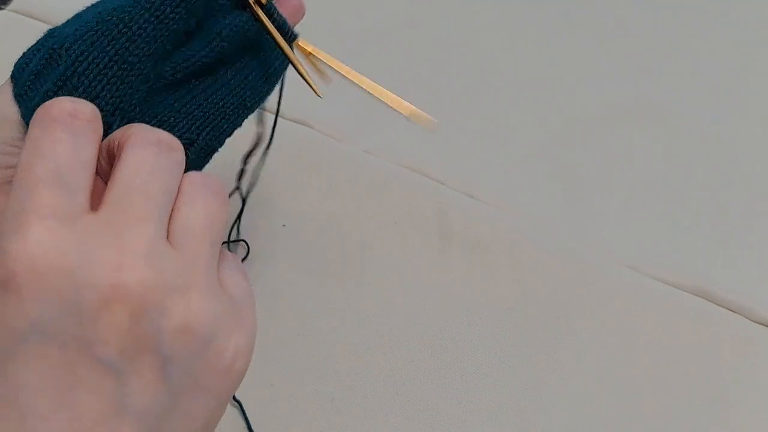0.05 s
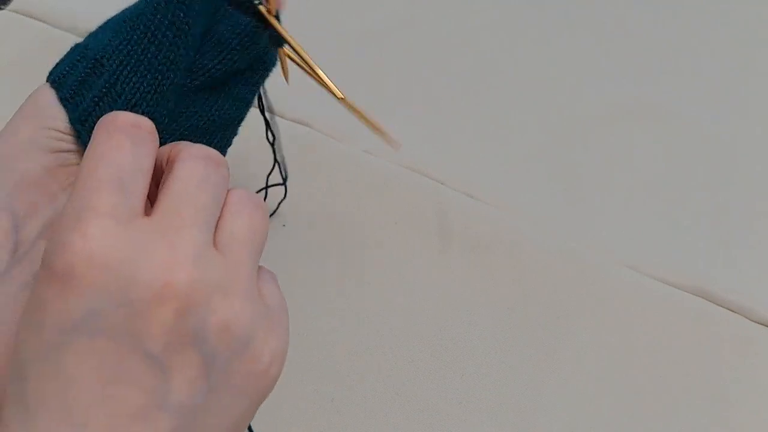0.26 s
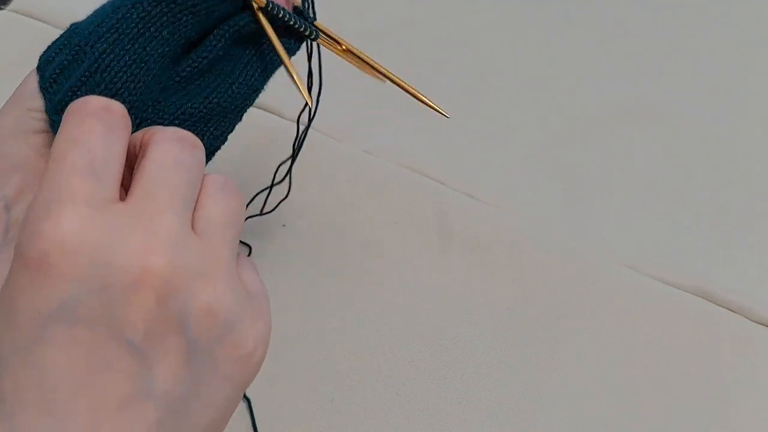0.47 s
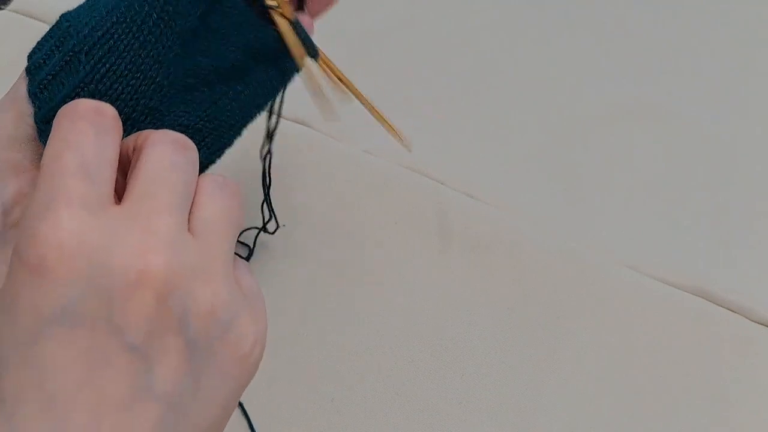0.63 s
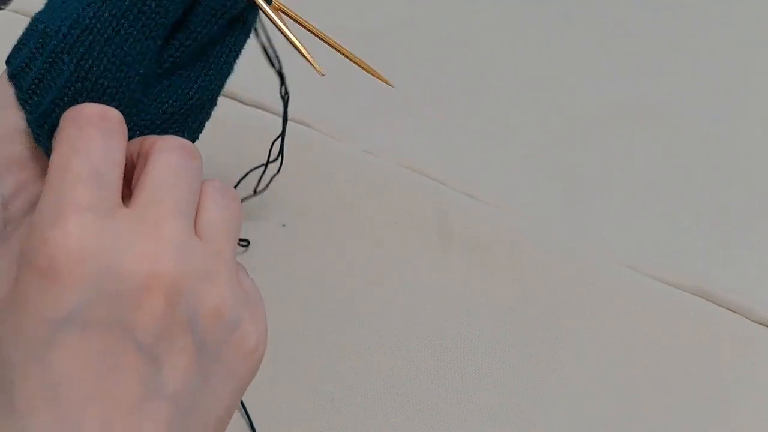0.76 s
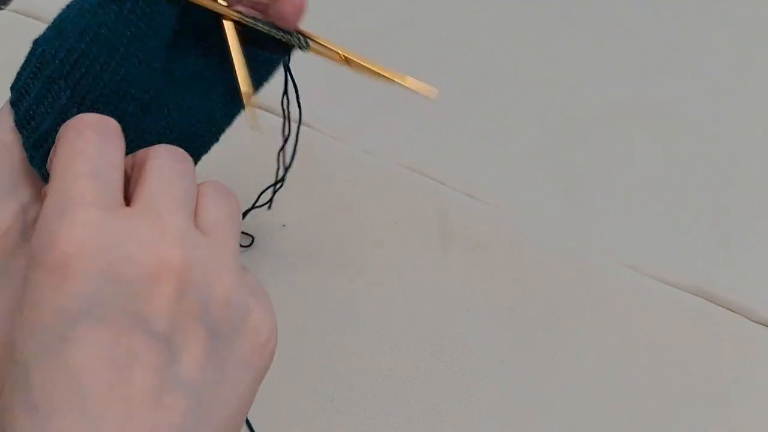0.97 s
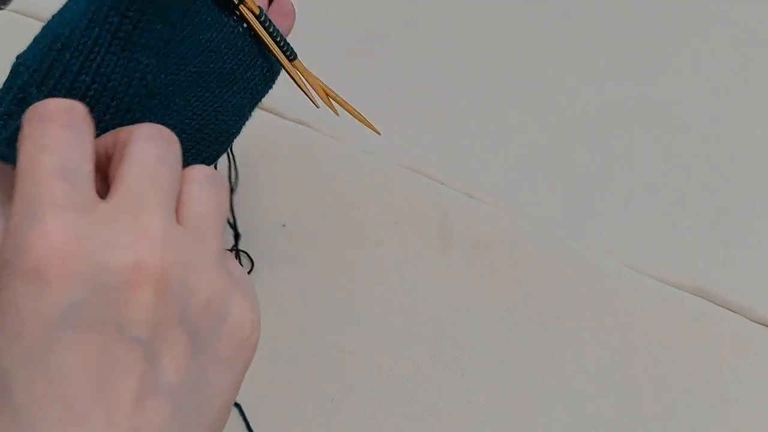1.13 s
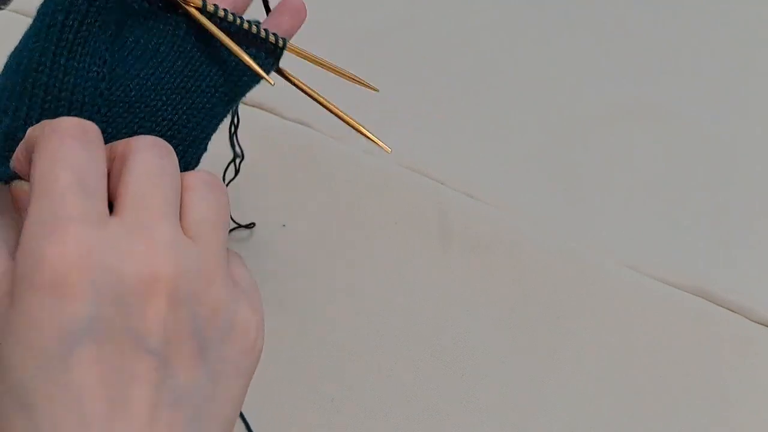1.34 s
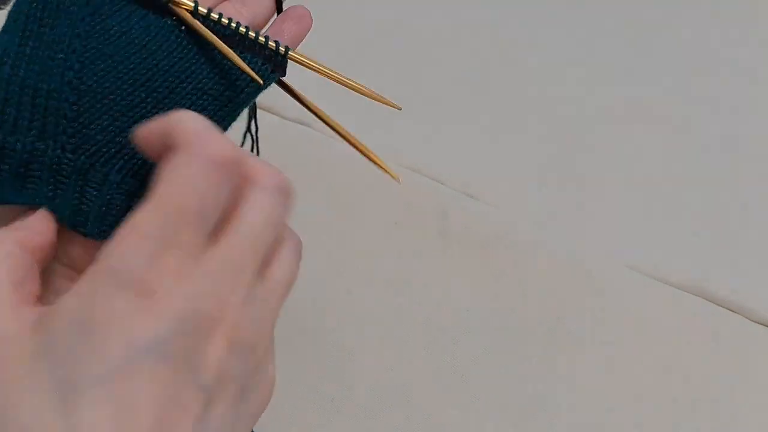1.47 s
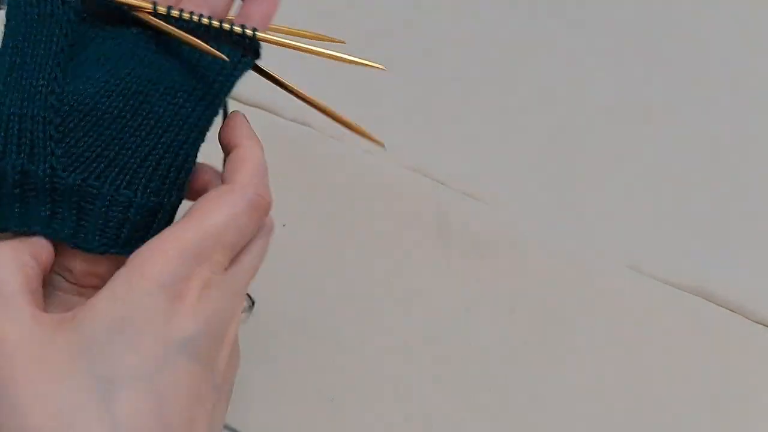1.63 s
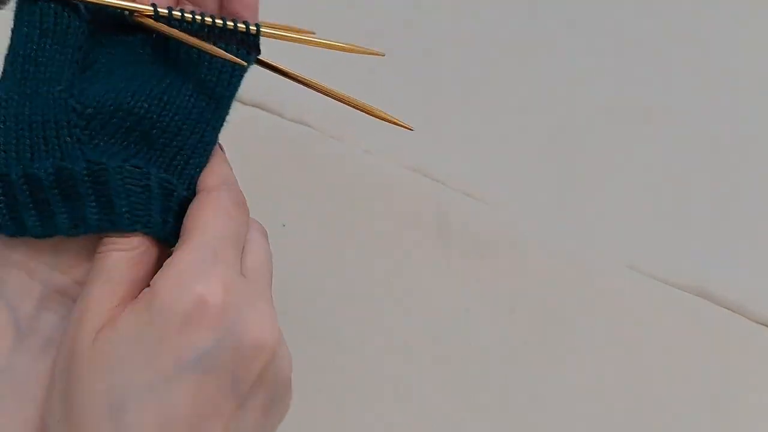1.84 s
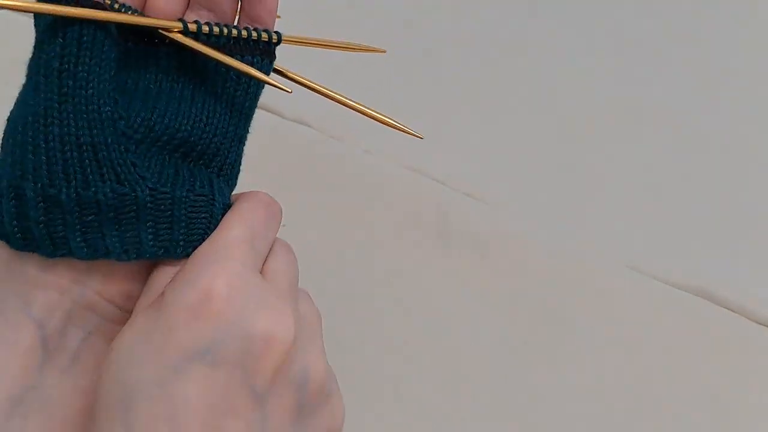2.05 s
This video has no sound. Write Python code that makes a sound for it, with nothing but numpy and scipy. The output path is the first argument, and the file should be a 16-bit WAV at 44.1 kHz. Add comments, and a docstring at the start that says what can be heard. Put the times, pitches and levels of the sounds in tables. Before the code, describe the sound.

Bright, tinny clinks of hollow knitting needles, with soft wool rustle and a low handling rumble

```python
"""A woollen cuff is pulled over a hand while hollow metal knitting needles knock against each other.
From the start: a stand's low sway (gliding sine), a quiet room's hiss, wool (noise grains) and skin rub.
Soft table bumps (short sine bursts) join at 0.12 s; knocks (struck bending modes) and ticks (damped,
wavering pitches) crowd in from 0.2 s, with a short bright room tail. After 1.25 s they grow sparse and faint."""
import sys
import numpy as np
from scipy import signal
from scipy.fft import rfft, irfft
from scipy.io import wavfile
from scipy.ndimage import uniform_filter1d

SR = 44100
rng = np.random.default_rng(int(sys.argv[2]) if len(sys.argv) > 2 else 0)


def to_wav(sig):
    """Store sig (one row per channel, or 1-D mono) as 16-bit WAV at the path in sys.argv[1].

    Samples outside -1..1 are clipped; the rate is SR.
    """
    pcm = np.clip(np.atleast_2d(sig), -1, 1) * 32767
    pcm = np.round(pcm).astype(np.int16)
    wavfile.write(sys.argv[1], SR, pcm.T)  # frames by channels


def invert_db(x):
    """Field ratio 10**(x/20) for x, a level in decibels (scalar or array-like)."""
    u = np.asarray(x, float) / 20
    return 10 ** u


N = 92610

# stand sway: (time [s], pitch [Hz], level [dB])
SWAY = [(0.0, 53.2, -32), (0.03, 53.6, -36), (0.05, 53.9, -48), (0.06, 54.4, -38), (0.14, 54.6, -33),
        (0.16, 54.6, -42), (0.19, 54.6, -35), (0.38, 54.6, -39), (0.41, 54.1, -53), (0.45, 51.9, -31),
        (0.48, 50.0, -29), (0.51, 49.0, -30), (0.57, 49.2, -24), (0.67, 48.2, -25), (0.7, 47.9, -36),
        (0.74, 47.8, -24), (0.88, 47.7, -25), (0.99, 47.7, -51), (1.02, 47.7, -39), (1.1, 47.7, -41),
        (1.15, 47.7, -53), (1.2, 47.8, -37), (1.23, 48.6, -36), (1.27, 50.2, -56), (1.3, 50.4, -43),
        (1.32, 50.3, -54), (1.36, 49.5, -39), (1.42, 49.0, -45), (1.43, 49.1, -53), (1.49, 49.1, -35),
        (1.53, 49.1, -55), (1.57, 49.1, -36), (1.61, 49.0, -53), (1.67, 49.1, -37), (1.72, 49.1, -46),
        (1.76, 49.1, -36), (1.79, 49.1, -49), (1.83, 49.1, -41), (1.9, 49.0, -57), (1.94, 49.1, -40),
        (2.0, 49.1, -52), (2.03, 49.1, -41), (2.05, 49.1, -54), (2.1, 49.1, -40)]
# handling noise spectrum: (frequency [Hz], relative level [dB])
SHAKE_SPECTRUM = [(38, -73), (65, -3.5), (81, -19), (146, -1.5), (173, -26.5), (400, -21), (520, -60),
                  (880, -120)]
SHAKE_MAX_DB, SHAKE_DB_PER_SWAY_DB = -46, 0.85

# room hiss spectrum: (frequency [Hz], relative level [dB])
HISS_SPECTRUM = [(12, -16), (20, -0.5), (55, -11), (95, -12), (137, -14.5), (191, -19.5), (253, -17),
                 (374, -25.5), (751, -32), (1020, -26.5), (1110, -30.5), (2950, -37), (9770, -41),
                 (15700, -50)]
HISS_RMS_DB = -47.5

# wool rustle: (time [s], level [dB])
WOOL_LEVEL = [(0, -52), (.04, -46), (.1, -57.5), (.17, -49), (.25, -37), (.3, -46), (0.359, -44),
              (.41, -66), (.47, -58.5), (0.508, -41), (.6, -39), (.67, -41.5), (.76, -43.5), (.83, -48.5),
              (0.872, -46.5), (.9, -55), (.92, -65), (.96, -47.5), (1.008, -45), (1.04, -53.5),
              (1.1, -46.5), (1.15, -49), (1.18, -66), (1.22, -48), (1.27, -49), (1.3, -53.5), (1.37, -58),
              (1.41, -52.5), (1.44, -47.5), (1.49, -55), (1.54, -57), (1.59, -49), (1.63, -59),
              (1.665, -59), (1.7, -58), (1.74, -67), (1.78, -56), (1.798, -42), (1.84, -56), (1.87, -61),
              (1.96, -65), (2.03, -53.5), (2.1, -53.5)]
# wool spectrum: (frequency [Hz], relative level [dB])
WOOL_SPECTRUM = [(1470, -21.5), (2500, -7.5), (2870, -13.5), (3820, -9), (4120, -10.5), (10200, 3),
                 (12100, -7), (14300, -5), (15700, -11)]
WOOL_GRAINS_PER_S, WOOL_PATCH_DB = 4000, 2.5
WOOL_GRAIN_DB = 2.1  # mean excess of grain size, before the square root

# skin on wool: (time [s], level [dB])
RUB_LEVEL = [(0, -58), (.15, -59.5), (.3, -67), (.55, -57), (.7, -63), (1.01, -66), (1.2, -64), (1.3, -60),
             (1.4, -60), (1.55, -55.5), (1.65, -67), (1.8, -62), (2.1, -60)]
# skin rub spectrum: (frequency [Hz], relative level [dB])
RUB_SPECTRUM = [(250, -43), (500, 8), (1300, 2), (2200, -4.5), (3500, -32)]

# soft knocks on the table: (time [s], level [dB], pitch [Hz])
BUMPS = [(0.119, -47.5, 303), (.47, -40, 151.6), (0.631, -43, 145.5), (0.761, -45, 211), (1.38, -48.5, 600),
         (1.65, -42, 93), (1.888, -41, 246), (1.939, -45.5, 147)]
BUMP_CYCLES = 6.8

# loose needles knocking: (time [s], level [dB], low modes [dB], middle modes [dB], top modes [dB],
# ring time factor [1], crack [dB]); the last and the mode groups are relative to the level
KNOCKS = [(0.2014, -2, -9.5, -12, 0, 0.92, -1), (0.206, -12, -16, -11, -3, .7, 6.5),
          (0.2185, -3, -7, -17, 0, 0.51, -4.5), (0.2249, -3.5, -41, -12, -14, 0.56, -8),
          (.2340, -23, -13, -20, -10, 0.77, 6), (.3162, -16, -23, -8.5, -12, 0.45, -2.5),
          (.5342, -6, -22, -20, -6, 0.25, 2.7), (0.5375, -11.5, -22, -28, -8, .4, 5),
          (.5490, -8, -6, -24, -13, 0.067, 0.5), (0.5524, -8, -20, -23, -2, 0.97, -6),
          (0.57, -16, -20, -25, 3, 0.44, 4.5), (.6200, -3.5, -20.5, -21, 5, 0.21, -10.5),
          (.6280, -18.5, -15, -6, 6, 0.73, -7), (0.6868, -5.5, -5, 1.7, -5.5, 0.7, -24),
          (0.7843, -3.5, -26, -7, 2.8, .25, -11), (0.7905, -15.5, -30, -13, -9, 1, 0),
          (1.059, -0.5, -21.5, -28, -10, .5, -19.5), (1.1153, -22, -23, -18, -10, 0.33, -3),
          (1.2237, -18, -24, -16, -6, 0.36, -7), (0.8708, -21, -24, -22, -15, 0.14, 2),
          (1.552, -33, -13, -24, -10, 0.24, 3), (1.6584, -29, -24, -12, -6, 0.44, 2.5),
          (1.787, -36.5, -19, -22, -8, .3, 5.5)]
# needle bending modes: (frequency [Hz], relative level [dB], t60 before the ring time factor [s])
LOW_MODES = [(830, -30, .1), (2200, -14, .09), (4360, 3, .07)]
MIDDLE_MODES = [(7020, 3, .075), (7200, -12, .08)]
MAIN_MODES = [(9250, -10, .04), (9750, -5, .05), (9950, -3, .06), (10150, 0, .07), (10330, -3, .06),
              (10600, -3, .05), (10800, -5, .04), (11080, -6, .04), (8590, -14, .05)]
TOP_MODES = [(13600, -2, .06), (13820, 0, .06), (14050, -5, .04), (15100, -10, .04)]
DETUNE_RATIO, UNEVEN_DB = .004, 2.5  # standard deviations per mode and knock
LINGER_DB, LINGER_T60_S = -30, .42  # free needle ends ring on faintly
FLUTTER_DEPTH, FLUTTER_S = .6, .003
STRIKE_RISE_S, CHATTER_DECAY_S = .0007, .00052
# metal crack spectrum: (frequency [Hz], relative level [dB])
CRACK_SPECTRUM = [(530, -72), (900, -33), (1920, -30), (2640, -23.5), (4530, -15), (5510, -10), (9220, -6),
                  (10400, -0.5), (12100, -11.5), (14700, -8.5), (16200, -24), (16800, -80)]
CRACK_T60_S = .025

# needles gripped by stitches: (time [s], level [dB], pitch [Hz], rise [s], t60 [s])
TICKS = [(.203, -27, 2262, 0.002, 0.11), (0.321, -25.5, 4870, 0.00051, 0.024),
         (0.342, -37, 9020, 0.0088, 0.2), (0.493, -37, 8600, 0.0016, 0.082),
         (0.5335, -38.5, 1493, .002, 0.11), (0.5341, -17.5, 2930, 0.0007, 0.046),
         (.56, -39.5, 1560, .01, 0.14), (.785, -36.5, 1810, .001, 0.043),
         (0.784, -32.5, 4160, 0.0013, 0.028), (0.793, -30, 6030, 0.0023, 0.037),
         (.203, -47, 1610, .003, 0.12), (0.568, -20, 5630, 0.00092, 0.021),
         (0.792, -42, 2300, 0.0012, 0.15), (0.855, -29, 12100, 0.0057, 0.055),
         (0.856, -26.5, 5300, 0.016, 0.073), (.871, -22.5, 15000, .001, 0.041),
         (0.871, -35, 3875, .002, 0.095), (0.886, -25.5, 8500, 0.0015, 0.049),
         (0.888, -13, 11040, 0.0052, 0.017), (1.059, -21.5, 4394, 0.00059, 0.029),
         (1.06, -40, 2216, .002, 0.031), (1.058, -21, 5680, 0.0017, 0.034), (1.059, -24, 7370, .002, 0.058),
         (1.114, -31, 4250, 0.0013, .03), (1.115, -25.5, 11200, 0.00078, .03),
         (1.117, -32, 15300, 0.0019, 0.027), (1.131, -28, 11300, 0.002, 0.027),
         (1.2245, -31.5, 6050, 0.0037, 0.039), (1.251, -23, 6000, 0.007, 0.015),
         (1.250, -26, 9100, 0.0034, 0.037), (1.5507, -26.5, 8470, 0.0011, 0.032),
         (1.647, -38, 9500, .001, .02), (1.659, -39.5, 6440, .002, 0.026), (1.79, -37, 9580, .003, 0.047),
         (1.8, -49, 4990, .01, 0.19), (2.021, -51.5, 3760, 0.016, 0.52), (2.0667, -40, 7740, .003, 0.043)]
TICK_CRACK_DB, TICK_WIDTH_PER_HZ = -6, .097
TICK_STEADY = .4  # amplitude of the steady tone beside the wavering one

ROOM_DB, ROOM_T60_S, ROOM_HIGHPASS_HZ = -12, .12, 6000
EDGE_HZ, ABOVE_EDGE_DB = 15850, -34


def read(points, hz):
    """Interpolates a spectrum table in dB over log frequency."""
    f, db = np.transpose(points)
    return np.interp(np.log(hz + 1), np.log(f + 1), db)


def evened(x):
    """Scales to unit rms."""
    return x / np.sqrt(np.mean(x ** 2) + 1e-20)


def coloured_noise(n, points):
    """White noise filtered by a spectrum table, at unit rms."""
    gain = invert_db(read(points, np.fft.rfftfreq(n, 1 / SR)))
    return evened(irfft(rfft(rng.standard_normal(n)) * gain, n))


def level_curve(points):
    """Amplitude over the scene from (time [s], level [dB])."""
    s, db = np.transpose(points)
    return invert_db(np.interp(np.arange(N) / SR, s, db))


def smoothed_twice(x, width, axis=-1):
    """Two running means in a row."""
    return uniform_filter1d(uniform_filter1d(x, width, axis), width, axis)


def soft_rise(t, rise_s):
    """Squared-sine onset."""
    return np.sin(np.pi / 2 * np.minimum(t / rise_s, 1)) ** 2


def add(mix, s, sound):
    """Adds a sound at time s, cut at the end of the mix."""
    part = mix[round(s * SR):][:len(sound)]
    part += sound[:len(part)]


def rumble():
    """The stand sways at one gliding low pitch; handling noise rises with it."""
    s, hz, db = np.transpose(SWAY)
    t = np.arange(N) / SR
    level_db = uniform_filter1d(np.interp(t, s, db), 900)
    cycles = np.cumsum(np.interp(t, s, hz)) / SR
    sway = np.sqrt(2) * invert_db(level_db) * np.sin(2 * np.pi * cycles)
    slow_db = uniform_filter1d(level_db, 6000)
    shake_db = SHAKE_MAX_DB + SHAKE_DB_PER_SWAY_DB * (slow_db - slow_db.max())
    return sway + coloured_noise(N, SHAKE_SPECTRUM) * invert_db(shake_db)


def room_hiss():
    """Steady coloured noise of a quiet room."""
    return invert_db(HISS_RMS_DB) * coloured_noise(N, HISS_SPECTRUM)


def wool():
    """Fibres crackle as dense noise grains, in drifting patches of colour."""
    struck = rng.random(N) < WOOL_GRAINS_PER_S / SR
    size = invert_db(WOOL_GRAIN_DB * np.minimum(rng.exponential(1, N), 5)) * struck
    envelope = np.sqrt(abs(uniform_filter1d(size, 40)))
    hz, _, z = signal.stft(envelope * rng.standard_normal(N), SR, nperseg=256, noverlap=192)
    noise = uniform_filter1d(rng.standard_normal(z.shape), 6, 0)  # across frequency
    patch = evened(uniform_filter1d(noise, 25, 1))  # across time
    z = z * invert_db(read(WOOL_SPECTRUM, hz)[:, None] + WOOL_PATCH_DB * patch)
    crackle = signal.istft(z, SR, nperseg=256, noverlap=192)[1][:N]
    return evened(crackle) * level_curve(WOOL_LEVEL)


def skin_rub():
    """Skin rubbing on wool: coloured noise under a level curve."""
    return coloured_noise(N, RUB_SPECTRUM) * level_curve(RUB_LEVEL)


def bumps():
    """Wrists bump the table softly: a few sine cycles under a rounded envelope."""
    out = np.zeros(N)
    for s, level_db, hz in BUMPS:
        cycles = np.arange(0, BUMP_CYCLES, hz / SR)
        envelope = np.sin(np.pi * (cycles / BUMP_CYCLES) ** 1.05) ** 2
        add(out, s, invert_db(level_db) * envelope * np.sin(2 * np.pi * cycles))
    return out


def crack(t, t60_s):
    """A broad decaying noise burst from metal meeting metal."""
    return coloured_noise(len(t), CRACK_SPECTRUM) * invert_db(-60 * t / t60_s) / 2


def flutter(t):
    """Needles resting on each other make the ringing waver."""
    waver = evened(smoothed_twice(rng.standard_normal(len(t)), round(FLUTTER_S * SR)))
    return 1 + FLUTTER_DEPTH * np.minimum(t / FLUTTER_S / 2, 1) * waver


def chatter():
    """A first contact, then sparse random ones dying away, at unit energy."""
    t = np.arange(200) / SR
    contacts = .3 * rng.standard_normal(200) * np.exp(-t / CHATTER_DECAY_S) * (rng.random(200) < .1)
    contacts[0] = 1
    return contacts / np.linalg.norm(contacts)


def knock(level_db, low_db, middle_db, top_db, ring_factor, crack_db):
    """A strike and a faint chatter set all bending modes ringing."""
    t = np.arange(12000) / SR
    ringing = np.zeros(len(t))
    groups = ((LOW_MODES, low_db), (MIDDLE_MODES, middle_db), (MAIN_MODES, 0), (TOP_MODES, top_db))
    for modes, group_db in groups:
        for hz, mode_db, t60_s in modes:
            uneven, detune, phase_cycles = rng.standard_normal(3)
            fade = invert_db(-60 * t / (t60_s * ring_factor)) + invert_db(LINGER_DB - 60 * t / LINGER_T60_S)
            gain = invert_db(group_db + mode_db + UNEVEN_DB * uneven)
            cycles = hz * (1 + DETUNE_RATIO * detune) * t + phase_cycles
            ringing += gain * fade * flutter(t) * np.sin(2 * np.pi * cycles)
    rise = soft_rise(t, STRIKE_RISE_S)
    ringing = signal.oaconvolve(ringing * rise, chatter())[:len(t)]
    return invert_db(level_db) * (ringing / 4 + invert_db(crack_db) * rise * crack(t, CRACK_T60_S))


def tick(level_db, hz, rise_s, t60_s):
    """A damped needle is tapped or scraped: a steady tone plus narrow noise around one pitch."""
    t = np.arange(9000) / SR
    pole = np.exp(-np.pi * TICK_WIDTH_PER_HZ * hz / SR)
    drift = rng.standard_normal((2, len(t)))
    for _ in range(2):
        drift = signal.lfilter([1 - pole], [1, -pole], drift)
    wander = (evened(drift[0]) + 1j * evened(drift[1])) / 2
    wave = (np.exp(2j * np.pi * hz * t) * (TICK_STEADY + wander)).real
    body = wave * invert_db(-60 * t / t60_s) + invert_db(TICK_CRACK_DB) * crack(t, t60_s)
    return invert_db(level_db) * soft_rise(t, rise_s) * body


def room_tail(x):
    """A short, bright tail of sparse random reflections."""
    t = np.arange(12000) / SR
    signs = rng.choice([-1., 1.], len(t)) * (rng.random(len(t)) < .06)
    taps = signs * invert_db(-60 * t / ROOM_T60_S) * (t > .002)
    bright = signal.lfilter(*signal.butter(1, ROOM_HIGHPASS_HZ, "high", fs=SR), x)
    return invert_db(ROOM_DB) * signal.oaconvolve(bright, taps / np.linalg.norm(taps))[:N]


def scene():
    """Rumble, hiss, wool and hands, with needles in the room."""
    background = rumble() + room_hiss() + wool() + skin_rub() + bumps()
    needles = np.zeros(N)
    for s, *settings in KNOCKS:
        add(needles, s, knock(*settings))
    for s, *settings in TICKS:
        add(needles, s, tick(*settings))
    return (background + needles + room_tail(needles))[None]


def band_limit(x):
    """A steep low-pass at the top of the band."""
    return signal.sosfilt(signal.butter(12, 16970, fs=SR, output="sos"), x)


def record(dry):
    """A steep filter steps the treble down above the band edge."""
    lowpass = signal.firwin(1023, EDGE_HZ, window=("kaiser", 6), fs=SR)
    low = signal.oaconvolve(dry, lowpass[None], "same")
    mix = low + invert_db(ABOVE_EDGE_DB) * (dry - low)
    return band_limit(mix)


dry = scene()
out = record(dry)
to_wav(out)
```